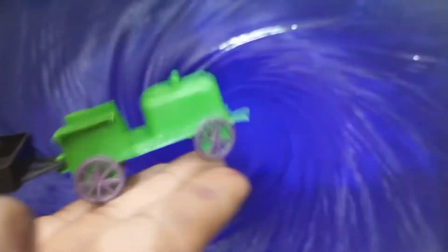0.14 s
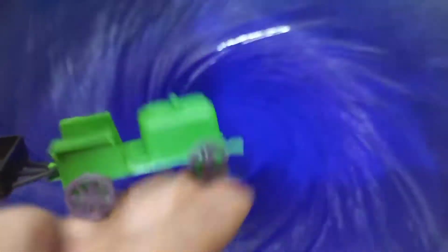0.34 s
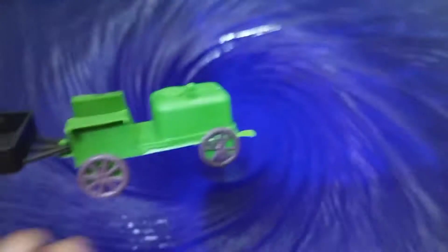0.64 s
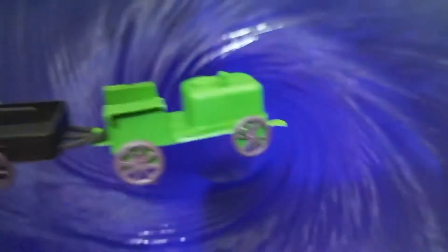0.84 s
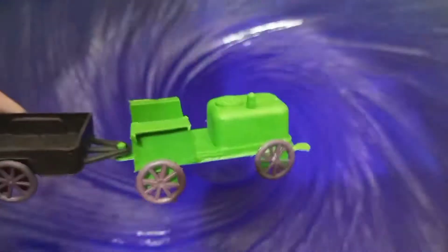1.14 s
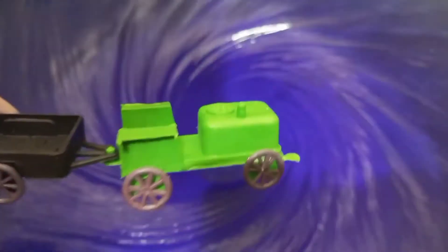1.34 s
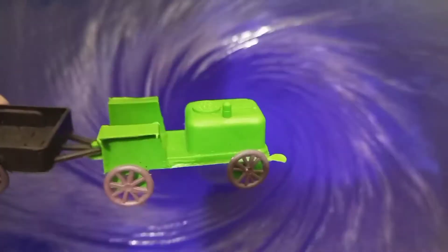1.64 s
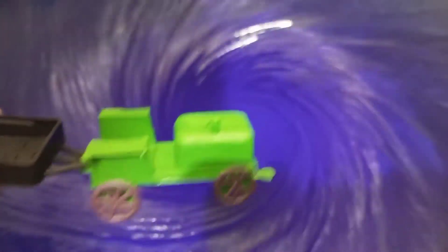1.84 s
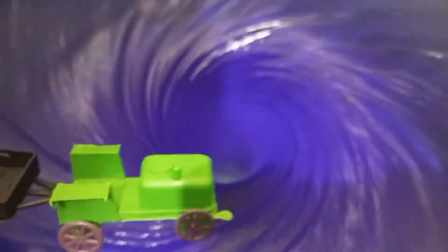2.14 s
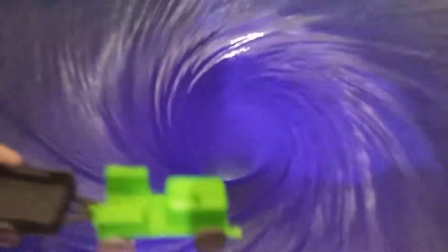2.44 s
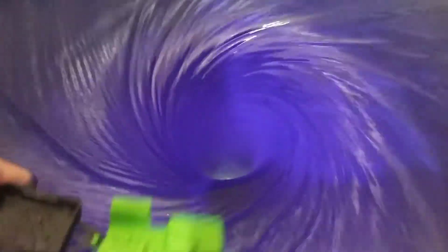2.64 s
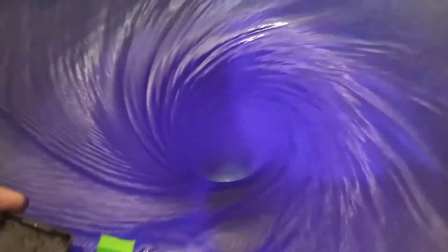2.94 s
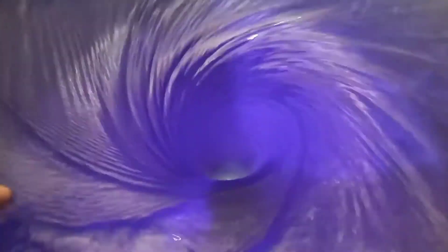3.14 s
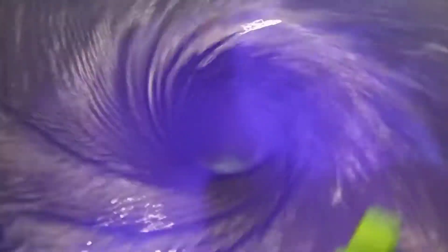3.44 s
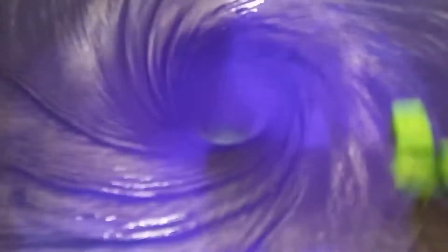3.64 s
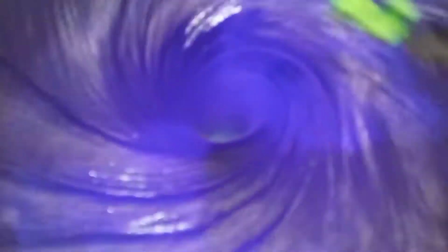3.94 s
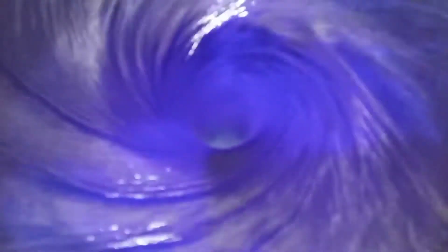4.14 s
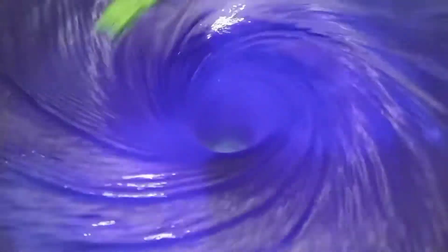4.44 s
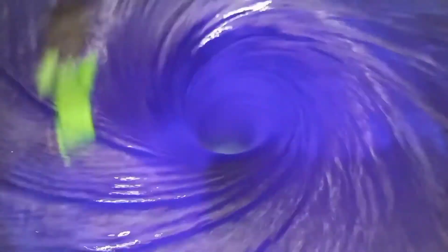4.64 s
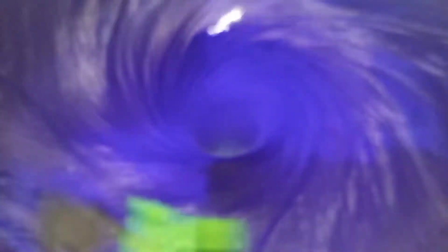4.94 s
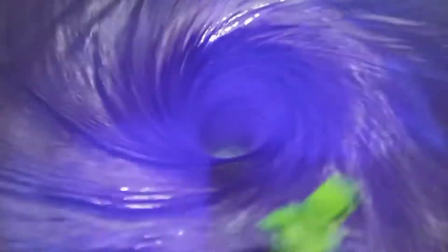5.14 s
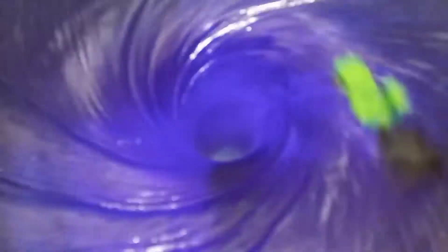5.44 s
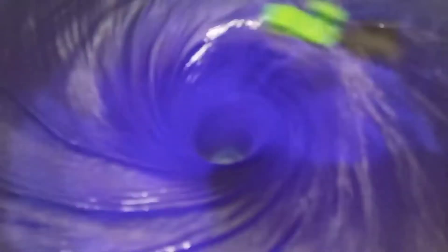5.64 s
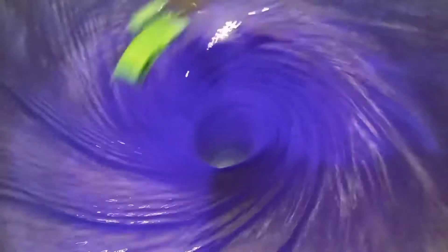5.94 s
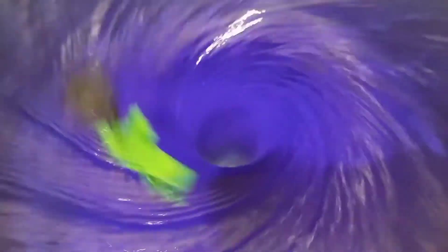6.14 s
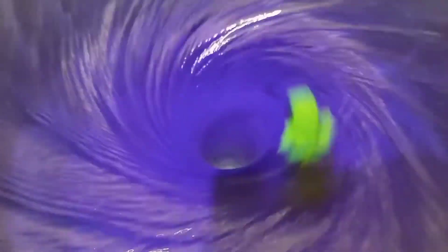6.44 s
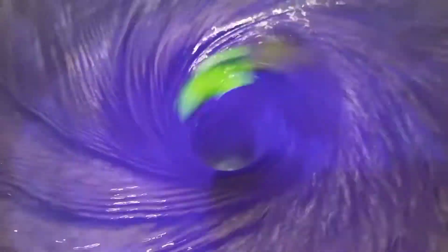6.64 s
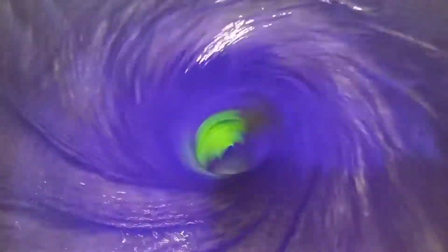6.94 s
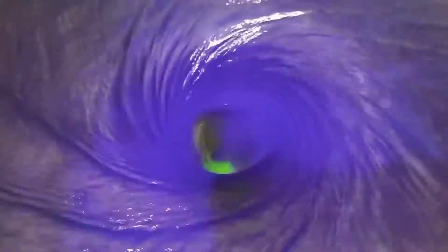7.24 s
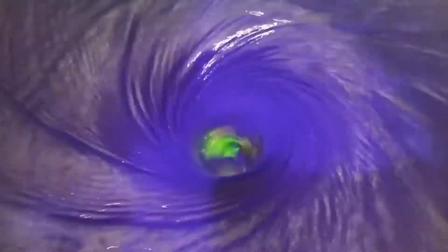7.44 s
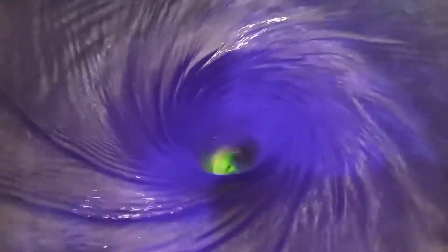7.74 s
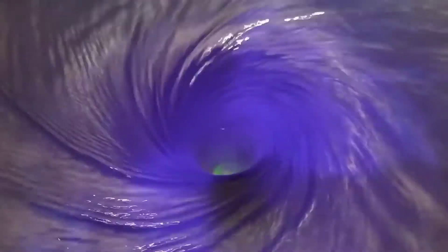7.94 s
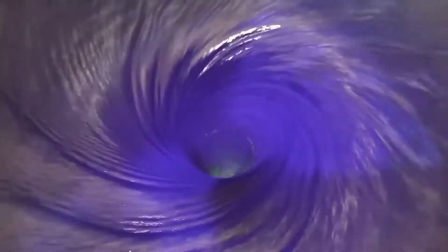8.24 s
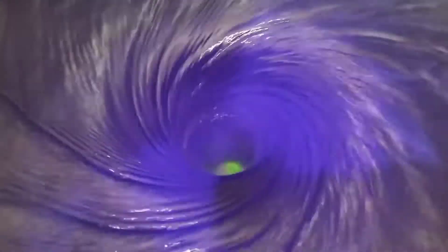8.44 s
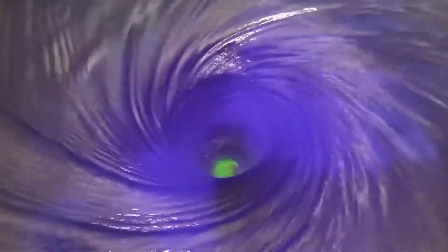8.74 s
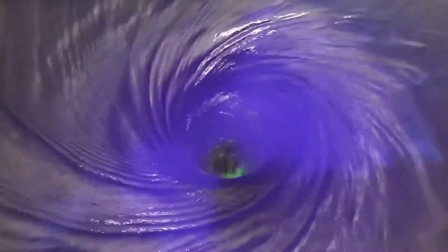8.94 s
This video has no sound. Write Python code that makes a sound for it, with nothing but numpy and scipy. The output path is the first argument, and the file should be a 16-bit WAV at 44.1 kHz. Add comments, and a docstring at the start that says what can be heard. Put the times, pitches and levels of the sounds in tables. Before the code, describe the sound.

Close, muffled mono sound of water whirling in a tank: a steady narrow rush focused around 2-3 kHz, with a thin constant pump whine and quick throbbing hum. A plastic toy knocks lightly at the start, then scattered drops and bubbles plink and tick. Near the end the toy blocks the drain, which gulps air and splutters in loud, ringing, splashing bursts until the cut.

```python
"""A whirling rush of water in a tank, over a pump that whines, hums and throbs with each turn.
Drops and bubbles then ring and tick on the surface, a few cracks stand out, and low tones swell and fade.
At the end a toy chokes the drain, which gulps air and splutters in ringing, splashing bursts.
The sounds are filtered noise, struck resonances and decaying sines, in one channel. The microphone sits
close by in a closed case that favours 2-3 kHz and shuts out most of the treble."""
import sys
import numpy as np
from scipy import signal
from scipy.fft import rfft, irfft, next_fast_len
from scipy.io import wavfile
from scipy.ndimage import uniform_filter1d

SR = 44100
rng = np.random.default_rng(int(sys.argv[2]) if len(sys.argv) > 2 else 0)


def unload_wav(signal):
    """Save mono or channel-first audio to the path in sys.argv[1] as 16-bit WAV at rate SR, clipped to [-1, 1]."""
    wavfile.write(
        sys.argv[1],
        SR,
        np.round(np.clip(np.atleast_2d(signal).T, -1, 1) * 32767).astype(np.int16),
    )


N = 401310  # length [samples]

# Flow of the vortex, before the case colours it:
# (time [s], rush level [dB], spray level [dB], depth of the surge at each pump turn [dB])
VORTEX_FLOW = [(0.0, -37.5, -50.5, 0.2), (1.5, -38, -52.5, 0.4), (2.0, -38.5, -50.5, -0.3),
               (2.5, -38.5, -53, 1), (3.0, -35.5, -51, 0.5), (4.0, -36.5, -50.5, 1.5),
               (5.0, -38.5, -52.5, 0.5), (5.5, -37.5, -50.5, 0), (6.0, -40, -51.5, 1.3),
               (6.5, -38.5, -50, 0.3), (7.0, -38, -48.5, -0.5), (8.0, -35, -48, -0.2)]
# Colour of the rush heard through the case: (frequency [Hz], relative density [dB per Hz])
RUSH_SPECTRUM = [(20, -60.5), (55, -23), (80, -22.5), (160, -18), (330, -18.5), (700, -22), (1040, -22.5),
                 (1600, -15.5), (1840, -4.5), (2110, -8), (2500, 2.5), (4000, -22.5), (5000, -19),
                 (7000, -28.5), (8000, -44.5)]
# Resonances of tank and case that lift the rush: (frequency [Hz], width [Hz], lift [dB])
CASE_RESONANCES = [(1845, 220, 1.5), (2300, 51, 5.5), (2510, 27, 2.5), (2994, 51, 8), (3190, 17, 12.5),
                   (3410, 9.5, 11), (3710, 38, 8), (5400, 100, 6)]
# Pump housing modes; the load level is added to the first two:
# (frequency [Hz], width of each of two passes [Hz], level [dB], throb depth [dB],
#  share of the second throb at the start [1], lag [turns])
HOUSING_MODES = [(904.7, 44, 1, 4, 0.81, -0.0079), (1186, 27, 3, 4, 0.13, 0.53),
                 (1319, 79, -63.5, 4, 0.92, 0.076), (1454, 12, -65, 3, 0.15, 0.027),
                 (382, 21, -67, 1, .3, 0.42)]
# Changing strength of the first two modes: (time [s], first mode level [dB], second mode level [dB])
HOUSING_LOAD = [(0.0, -66, -69), (0.29, -66.5, -75), (6.88, -61, -65), (7.84, -63.5, -89), (7.95, -71, -57)]
# Colour of hiss and cracks above the muffled range: (frequency [Hz], relative density [dB per Hz])
TOP_SPECTRUM = [(6500, -23), (7900, -36.5), (10000, -11), (13900, -17), (14600, 1.5), (15700, 1)]
# Dry broadband ticks, the first as the plastic toy knocks: (time [s], relative strike level [dB])
TICK_STRIKES = [(0.2362, -12), (0.249, -24), (0.31, -25.5), (0.789, -27), (1.98, -28), (2.835, -29),
                (3.022, -28), (3.112, -31), (4.721, -39), (5.17, -29), (5.913, -41), (6.256, -34),
                (7.282, -34), (7.991, -21), (8.241, -24), (8.437, -25)]
# Drops and bubbles on the surface, ahead of the case: (time [s], ring level [dB], pitch [Hz])
SURFACE_BUBBLES = [(0.2362, -27, 2830), (0.2504, -21.5, 3630), (0.37, -31, 4560), (0.7266, -32.5, 4970),
                   (0.771, -32.5, 4680), (0.8946, -34, 5400), (1.038, -23.5, 2660), (1.4923, -35.5, 4960),
                   (1.6457, -33, 5320), (1.941, -28.5, 4200), (2.0088, -29.5, 5060), (2.0203, -25, 2510),
                   (2.0622, -35.5, 4750), (2.249, -25, 4140), (2.8352, -21, 2650), (2.9088, -39, 5670),
                   (3.0216, -37, 4870), (3.035, -33, 2580), (3.166, -27.5, 4530), (3.192, -27, 2610),
                   (3.4305, -32.5, 3960), (3.5832, -25, 2960), (3.7234, -35.5, 5310), (3.852, -30, 4630),
                   (4.2125, -23.5, 2570), (4.3792, -27, 2460), (4.4485, -33, 4850), (4.55, -24.5, 2520),
                   (4.559, -36, 6100), (4.634, -35, 4340), (4.656, -39, 5420), (5.5735, -28, 2420),
                   (6.157, -40.5, 4490), (6.2543, -21.5, 2460), (6.44, -29.5, 5560), (6.4694, -37, 5430),
                   (6.583, -35.5, 5400), (6.7478, -23, 2617), (7.0707, -17, 3550), (7.2098, -20.5, 2300),
                   (7.353, -31, 3520), (7.415, -31, 4880), (7.4639, -35, 3850), (7.4882, -21.5, 5200),
                   (7.5427, -28.5, 4770), (7.658, -32, 4500), (7.6914, -23, 3840)]
# Sharp cracks that reach the top octave: (time [s], relative level [dB])
TOP_CRACKS = [(0.2374, -54), (8.763, -34.5), (9.0698, -44)]
# Low tones that swell and fade near 380 Hz, as of the pump housing, and at other pitches:
# (middle time [s], peak level [dB], frequency [Hz], length [s])
HUM_SWELLS = [(0.73, -45.5, 382, 0.045), (0.876, -46, 370, 0.014), (1.148, -57.5, 232, 0.11),
              (2.276, -45.5, 131, 0.11), (2.544, -48, 382, 0.046), (3.016, -49.5, 390, 0.13),
              (3.497, -56, 382, 0.093), (3.94, -56, 149, 0.12), (5.008, -46, 371, 0.04),
              (5.128, -56.5, 378, 0.22), (5.94, -52, 370, 0.05), (6.435, -47.5, 261, 0.024),
              (6.484, -58.5, 599, 0.16), (7.202, -52, 389.3, 0.036), (7.494, -55, 131.4, .08)]
# Water thrashing round the toy: (time [s], splutter level [dB], spray level [dB])
TOY_THRASH = [(7.93, -44, -54), (8.009, -26.5, -39.5), (8.05, -53, -44), (8.1, -28.5, -43),
              (8.25, -36, -34.5), (8.42, -29.5, -40), (8.5, -24, -48), (8.6, -36, -40), (8.77, -24, -36),
              (8.85, -29, -42), (9.1, -24, -39.5)]
# Gulps of air down the choked drain: (time of the crest [s], gulp level [dB], pipe boom level [dB])
DRAIN_GULPS = [(8.001, -36, -39.5), (8.09, -30.5, -36.5), (8.17, -43.5, -43), (8.26, -57, -46),
               (8.37, -36, -59), (8.47, -23, -32.5), (8.668, -26, -39), (8.76, -36.5, -55),
               (8.83, -31.5, -42), (8.902, -25, -33), (8.998, -23.5, -33.5), (9.1, -25.5, -41)]
# Bubble sizes of boom, gulp, splutter and spray, in that order:
# (lowest pitch [Hz], highest pitch [Hz], time for a ring to fall 47 dB [s], bubbles [per s], trim [dB])
FROTH_LAYERS = [(197, 310, 0.21, 29, -1.5), (340.7, 1600, 0.17, 150, -2), (1621, 3500, 0.061, 390, -7),
                (3680, 6600, 0.038, 570, -9)]
# Rings and splashes of bursts in the drain, ahead of the case; rows at one time are parts of one burst:
# (time [s], ring level [dB], pitch [Hz], level of the splash that follows [dB])
DRAIN_BURSTS = [(7.954, -31, 660, -24), (7.991, -18.5, 804, -35), (8.026, -12, 2330, -27),
                (8.065, -16.5, 3850, -40), (8.072, -19, 378, -34), (8.12, -56, 5210, -35),
                (8.241, -7, 3680, -21.5), (8.243, -30, 5030, -33), (8.26, -24, 2830, -23),
                (8.332, -7.5, 2170, -20.5), (8.361, -9, 2300, -23), (8.362, -17, 1734, -24),
                (8.438, -23.5, 1017, -23), (8.459, 1, 2300, -19), (8.46, -9.5, 738, -20.5),
                (8.471, -4.5, 3850, -49), (8.545, -16.5, 1550, -41), (8.649, -8, 1780, -33),
                (8.663, -16.5, 774, -27.5), (8.706, -23, 6330, -40), (8.765, 2, 2710, -19.5),
                (8.765, -8, 4940, -32), (8.786, -7, 1994, -22.5), (8.82, -16, 1004, -27),
                (8.878, -11, 1270, -22), (8.878, -14.5, 533, -21.5), (8.879, -14, 4680, -55),
                (8.906, -26, 460, -16.5), (8.906, -14, 4640, -31.5), (8.965, -27, 958, -18.5),
                (8.991, 1, 2040, -17.5), (8.991, -1.5, 3210, -29), (9.068, -3, 4880, -28)]

TURN_HZ, FIRST_THROB_S, SURGE_LAG_TURNS = 5.888, 0.158, 0.012
WHINE_HZ, WHINE_PEAK_DB = 2303.5, -45.0
HUM_HZ, HUM_PEAK_DB = 100.2, -68.0
TOP_DB = -69  # level of the top hiss when the spray is at -65 dB
RING_T60_S = 0.028
RISE_AT_2500_HZ, RISE_FALLS = 0.15, 4  # small bubbles glide less: power of the pitch
# the splash level and size spread hold for a mean bubble of 4 kHz
SPLASH_DB, SPLASH_T60_S, SPLASH_OCTAVES, MEAN_BUBBLE_DB = -37.5, 0.17, 0.265, -29
SPLASH_FOLLOWS, SPLASH_DB_PER_OCTAVE = 0.79, -1.5  # share of the bubble's strength; low ones splash more
BURST_SPLASH_T60_S, BURST_SPLASH_OCTAVES = 0.2, 0.45
GULP_RISE_DB_PER_S, GULP_FALL_DB_PER_S = 400, 157
BOOM_RISE_DB_PER_S, BOOM_FALL_DB_PER_S = 455, 143
MUFFLE_HZ, CUTOFF_HZ = 7800, 15800


def from_db(db):
    """Amplitude gain of a level in dB."""
    return 10 ** (np.asarray(db) / 20)


def rms_one(x):
    """Scale to unit power."""
    return x / np.sqrt(np.mean(x ** 2) + 1e-20)


def in_time(rows):
    """Columns of a curve table, joined by straight lines, one value a sample."""
    times, *columns = np.transpose(rows)
    return [np.interp(np.arange(N) / SR, times, column) for column in columns]


def drift(rate_hz):
    """Slow random wander of spread 1: noise at a fortieth of the rate through two equal poles."""
    pole = np.exp(-80 * np.pi * rate_hz / SR)
    noise = rng.standard_normal(N // 40 + 2002)
    slow = signal.lfilter([1], [1, -2 * pole, pole ** 2], noise)[2000:]  # drop the settling
    return np.interp(np.arange(N) / 40, np.arange(len(slow)), rms_one(slow))


def resonance(x, hz, width_hz):
    """Two-pole resonance with gain 1 on top."""
    r = np.exp(-np.pi * width_hz / SR)
    top = [(1 - r * r) / 2, 0, (r * r - 1) / 2]
    return signal.lfilter(top, [1, -2 * r * np.cos(2 * np.pi * hz / SR), r * r], x)


def band(x, low_hz, high_hz):
    """Butterworth band-pass."""
    return signal.sosfilt(signal.butter(2, [low_hz, high_hz], "band", fs=SR, output="sos"), x)


def coloured(x, spectrum, lifts=()):
    """Give a sound a spectrum, with resonant lifts on it."""
    hz = np.maximum(np.fft.rfftfreq(N, 1 / SR), 1)
    points_hz, points_db = np.transpose(spectrum)
    colour_db = np.interp(np.log(hz), np.log(points_hz), points_db)
    for centre_hz, width_hz, lift_db in lifts:
        colour_db = colour_db + lift_db / (1 + (2 * (hz - centre_hz) / width_hz) ** 2)
    return irfft(rfft(x) * from_db(colour_db), N)


def grains(per_s, spread_db):
    """Random clicks of uneven size and sign, scaled to unit power."""
    sizes = from_db(spread_db * np.minimum(rng.exponential(1, N), 5))
    signs = rng.choice([-1, 1], N)
    return rms_one(sizes * signs * (rng.random(N) < per_s / SR))


def pump_turn(lag_turns):
    """Angle of the pump in radians, zero at each throb."""
    return 2 * np.pi * (TURN_HZ * (np.arange(N) / SR - FIRST_THROB_S) - lag_turns)


def surge(depth_db):
    """The flow swells once with each turn of the pump, in dB."""
    return depth_db * np.cos(pump_turn(SURGE_LAG_TURNS))


def rush(rush_db, spray_db):
    """Countless tiny bubbles: flickering bands of noise and fizz, coloured by the case."""
    out, together = 0, drift(11.0)
    edges_hz = 22 * 2 ** np.arange(0, 8.9, 1 / 3)  # third octaves
    sources = rng.standard_normal((2, N)) + 0.5 * grains(1500, spread_db=10.0)
    for k, (low, high) in enumerate(zip(edges_hz, edges_hz[1:])):
        # upper bands follow the spray and flicker more; the bass is lumpy and ignores the flow
        bright = np.clip(np.log2(low / 2800) / 0.11, 0, 1)
        lumpy = np.clip(np.log2(700 / low), 0, 1)
        flicker_db = (1 + 0.8 * bright) * (0.8 * together + 1.2 * drift(14))
        flicker_db += 3.87 * lumpy * drift(7.0)
        lower_db = rush_db * (1 - lumpy) - 40 * lumpy
        level_db = (1 - bright) * lower_db + bright * (spray_db + 13.0)
        out = out + from_db(level_db + flicker_db) * band(sources[k % 2], low, high)
    return from_db(10.5) * coloured(out, RUSH_SPECTRUM, CASE_RESONANCES)


def whine_and_hum():
    """The pump's whine wavers in level and phase; the mains hum wavers in level."""
    t = np.arange(N) / SR
    whine_gain = from_db(WHINE_PEAK_DB + 0.42 * drift(14))
    whine = whine_gain * np.sin(2 * np.pi * WHINE_HZ * t + 0.43 * drift(1))
    hum_gain = from_db(HUM_PEAK_DB + 0.47 * drift(4))
    return whine + hum_gain * np.sin(2 * np.pi * HUM_HZ * t)


def pump_housing():
    """Noise rings the housing modes, shaken once a turn with a second throb at twice that rate."""
    out = np.zeros(N)
    second_fade = 1 - 0.23 * np.arange(N) / (N - 1)  # the second throb fades as the tank empties
    loads = in_time(HOUSING_LOAD) + [0] * (len(HOUSING_MODES) - 2)
    for (hz, width_hz, level_db, throb_db, second, lag), load_db in zip(HOUSING_MODES, loads):
        turn = pump_turn(lag)
        throb = np.cos(turn) + second * second_fade * np.cos(2 * turn)
        once = resonance(rng.standard_normal(N), hz, width_hz)
        tone = rms_one(resonance(once, hz, width_hz))
        envelope = np.abs(signal.hilbert(tone, next_fast_len(N))[:N])
        tone = rms_one(tone / (envelope + 4.5))  # a driven mode beats less than free noise
        out += from_db(level_db + load_db + throb_db * throb) * tone
    return out


def top_hiss(spray_db):
    """Faint hiss and fine crackle above the muffled range, rising a little with the spray."""
    flicker_db = 0.82 * drift(10) + 2.1 * drift(40)
    fizz = rng.standard_normal(N) * from_db(flicker_db) + 0.5 * grains(300, spread_db=8.0)
    return from_db(TOP_DB + 0.38 * (spray_db + 65)) * rms_one(coloured(fizz, TOP_SPECTRUM))


def pops(events, ring_cycles, rises, t60, octaves):
    """Each event rings and rises in pitch; hiss and a cloud of lesser bubbles near that pitch follow."""
    out, t = np.zeros(N + SR), np.arange(SR // 5) / SR
    chances = rng.random((len(events), 3, 16, 1))  # sixteen lesser bubbles each
    noises = rng.standard_normal((len(events), len(t)))
    glides = np.broadcast_to(np.transpose([ring_cycles, rises]), (len(events), 2))
    splash_t60 = max(t60, 0.01)
    for event, (cycles, rise), (pitch, late, size), noise in zip(events, glides, chances, noises):
        s, ring_db, hz, splash_db = event
        swell = 1 - np.exp(-(t * hz / 3) ** 2)
        glide = 1 + rise * np.minimum(hz * t / cycles, 1)
        ring = np.sin(2 * np.pi * hz * t * glide) * from_db(-60 * t * hz / cycles)

        born = 0.45 * t60 * late ** 2
        age = np.maximum(t - born, 0)
        cloud_hz = hz * 2 ** (octaves * (pitch - 0.5))
        # later bubbles are fainter, and each dies fast
        fade_db = -10 * size - 60 * (born + 1.55 * age) / splash_t60
        cloud = np.sin(2 * np.pi * cloud_hz * age) * (1 - np.exp(-age * hz / 6)) * from_db(fade_db)

        half_band = 2 ** (octaves / 2)
        hiss = rms_one(band(noise, hz / half_band, hz * half_band))
        hiss = hiss * swell * from_db(-60 * t / splash_t60)
        splash = cloud.sum(axis=0) + 0.44 * hiss
        i = round(s * SR)
        out[i:i + len(t)] += from_db(ring_db) * swell * ring + from_db(splash_db) * splash
    return out[:N]


def small_drops():
    """Fainter drops at random times and pitches, loudest near 2.7 kHz on average."""
    place, octaves, size = rng.random((3, 120))
    hz = 1500 * 2 ** (2.1 * octaves)
    ring_db = -42 - 3 * np.log(np.maximum(size, 0.04)) - 3 * np.abs(np.log2(hz / 2700))
    rows = np.column_stack([place * N / SR, ring_db, hz, ring_db - 7.5])
    return pops(rows, ring_cycles=150, rises=0.046, t60=0.081, octaves=0.19)


def ticks():
    """Noise bursts of a few milliseconds, listed ones and fainter random ones, ringing in the case."""
    strikes = from_db(-38.0) * np.minimum(np.abs(grains(25, spread_db=-1.0)) / 40, 3)
    for s, strike_db in TICK_STRIKES:
        strikes[round(s * SR)] += from_db(strike_db)
    fade = from_db(-60 / (0.015 * SR))  # falls 60 dB in 15 ms
    envelope = signal.lfilter([1], [1, -fade], strikes)
    envelope = uniform_filter1d(envelope, size=60, origin=29)  # soften the onset
    burst = envelope * rng.standard_normal(N)
    wide = band(band(burst, 2300, 5330), 2000, 7300)
    return wide + 1.9 * resonance(wide, 2700, 610)


def surface():
    """Drops and bubbles ring equally long; the splash follows the strength and pitch of each."""
    s, ring_db, hz = np.transpose(SURFACE_BUBBLES)
    splash_db = SPLASH_DB + SPLASH_FOLLOWS * (ring_db - MEAN_BUBBLE_DB)
    splash_db = splash_db + SPLASH_DB_PER_OCTAVE * np.log2(hz / 4000)
    rows = np.column_stack([s, ring_db, hz, splash_db])
    rises = RISE_AT_2500_HZ * (2500 / hz) ** RISE_FALLS
    return pops(rows, RING_T60_S * hz, rises, SPLASH_T60_S, SPLASH_OCTAVES)


def cracks():
    """Short decaying noise bursts heard above the muffled range."""
    out, t = np.zeros(N + SR), np.arange(SR // 20) / SR
    noises = rng.standard_normal((len(TOP_CRACKS), len(t)))
    for (s, level_db), noise in zip(TOP_CRACKS, noises):
        i = round(s * SR)
        out[i:i + len(t)] += from_db(level_db - 60 * t / 0.061) * noise
    return from_db(6.0) * coloured(out[:N], TOP_SPECTRUM, [(9140, 860, 20)])


def hum_swells():
    """Each swell is a slightly unsteady low tone under a bell-shaped envelope."""
    out, t = 0, np.arange(N) / SR
    waver = 1.43 * drift(7.9)
    for s, level_db, hz, length in HUM_SWELLS:
        bell = np.exp(-(2 * (t - s) / length) ** 2)
        out = out + from_db(level_db) * bell * np.sin(2 * np.pi * hz * t + waver)
    return out


def gulp_level(crest_db, rise_db_per_s, fall_db_per_s):
    """Level in dB: each gulp climbs fast to its crest and dies away; the loudest one rules."""
    crest_s = np.array(DRAIN_GULPS)[:, :1]
    late = np.arange(N) / SR - crest_s
    slope_db = np.minimum(rise_db_per_s * late, -fall_db_per_s * late)
    return np.max(crest_db[:, None] + slope_db, axis=0)


def drain_levels():
    """Boom, gulp, splutter and spray in dB."""
    _, gulp_db, boom_db = np.transpose(DRAIN_GULPS)
    return [gulp_level(boom_db, BOOM_RISE_DB_PER_S, BOOM_FALL_DB_PER_S),
            gulp_level(gulp_db, GULP_RISE_DB_PER_S, GULP_FALL_DB_PER_S),
            *in_time(TOY_THRASH)]


def froth(low_hz, high_hz, ring_s, per_s):
    """Bubbles of sixteen sizes struck at random over a rough hiss, kept at an even loudness."""
    clicks, dealt = grains(per_s, spread_db=4.5), rng.integers(0, 16, N)
    pitches = low_hz * (high_hz / low_hz) ** ((np.arange(16) + rng.random(16)) / 16)
    rings = sum(resonance(clicks * (dealt == k) + 1e-18, hz, 1.73 / ring_s)
                for k, hz in enumerate(pitches))
    hiss = band(rng.standard_normal(N), low_hz, high_hz)
    mixed = rms_one(rings) + 0.45 * rms_one(hiss)
    out = rms_one(band(mixed, low_hz / 1.1, high_hz * 1.1))
    return out / np.sqrt(uniform_filter1d(out ** 2, SR // 20) + 0.034)


def choked_drain():
    """Boom, gulps, splutter and spray of froth, opening as the toy reaches the hole."""
    out = np.zeros(N)
    for (low_hz, high_hz, ring_s, per_s, trim_db), level_db in zip(FROTH_LAYERS, drain_levels()):
        out += from_db(level_db + trim_db) * froth(low_hz, high_hz, ring_s, per_s)
    opening = np.clip((np.arange(N) / SR - TOY_THRASH[0][0]) / 0.032, 0, 1)
    return opening * out


def drain_bursts():
    """Bursts in the drain, made of short rising rings and splashes; rows at one time form one burst."""
    return pops(DRAIN_BURSTS, 39, 0.018, BURST_SPLASH_T60_S, BURST_SPLASH_OCTAVES)


def through_case(bubbles, drain):
    """Two cavities of the case lift the drain; a steep low-pass muffles drain and bubbles alike."""
    lifted = drain + 2.7 * resonance(drain, 4880, 550) + 3.14 * resonance(drain, 2720, 400)
    muffle = signal.butter(10, MUFFLE_HZ, fs=SR, output="sos")
    return signal.sosfilt(muffle, bubbles + lifted)


def scene():
    """All sources at the one microphone, in one channel."""
    rush_db, spray_db, depth_db = in_time(VORTEX_FLOW)
    surge_db = surge(depth_db)
    rush_db, spray_db = rush_db + surge_db, spray_db + surge_db
    water = rush(rush_db, spray_db)
    pump = whine_and_hum() + pump_housing()
    thrash_spray_db = in_time(TOY_THRASH)[-1]
    hiss = top_hiss(np.maximum(spray_db, thrash_spray_db))
    bubbles = small_drops() + ticks() + surface() + drain_bursts()
    muffled = through_case(bubbles, choked_drain())
    return (water + pump + hiss + muffled + cracks() + hum_swells())[None]


def record(dry):
    """A steep elliptic low-pass cuts the top."""
    return signal.sosfilt(signal.ellip(12, 0.5, 60, CUTOFF_HZ, fs=SR, output="sos"), dry)


dry = scene()
out = record(dry)
unload_wav(out)
```